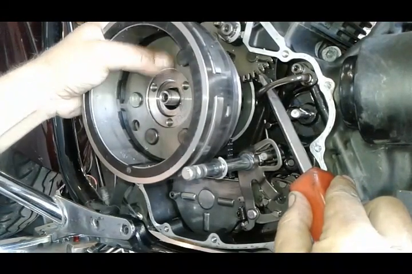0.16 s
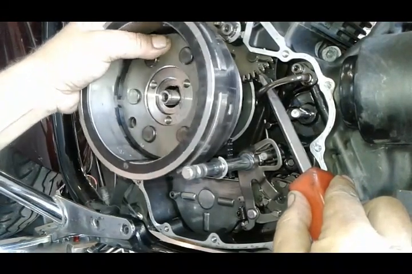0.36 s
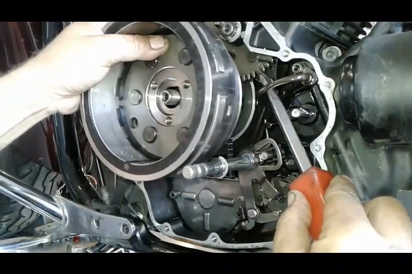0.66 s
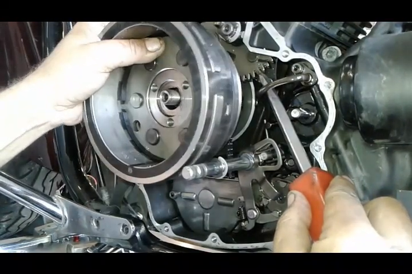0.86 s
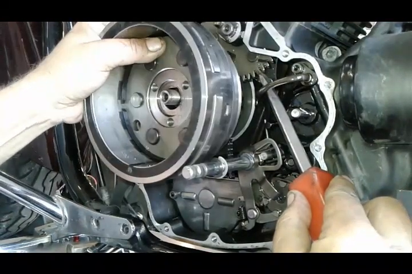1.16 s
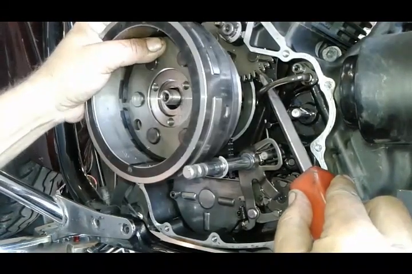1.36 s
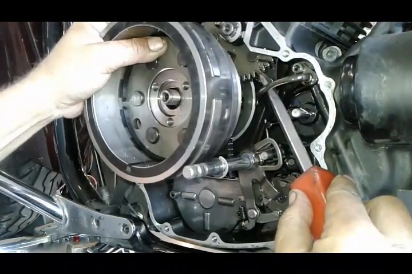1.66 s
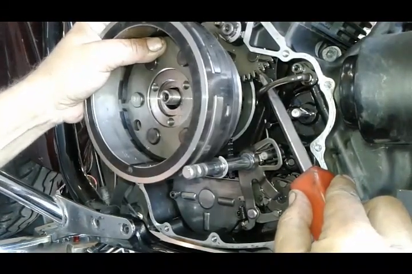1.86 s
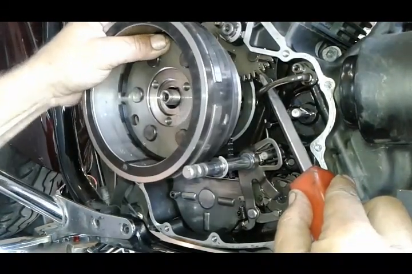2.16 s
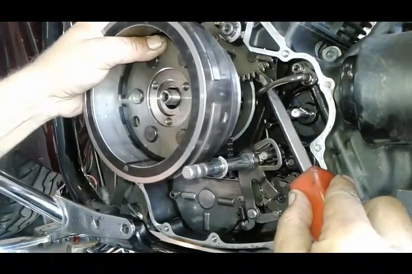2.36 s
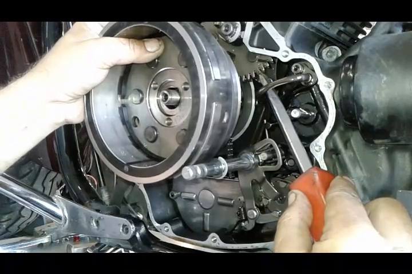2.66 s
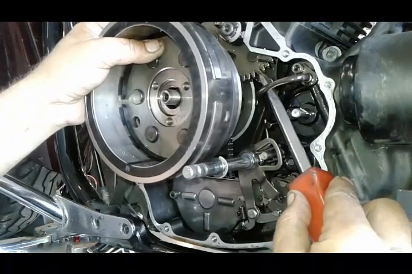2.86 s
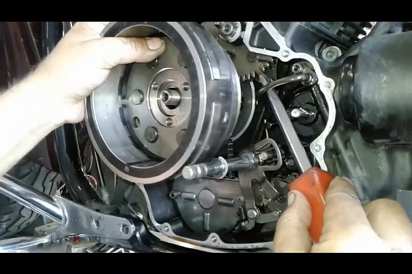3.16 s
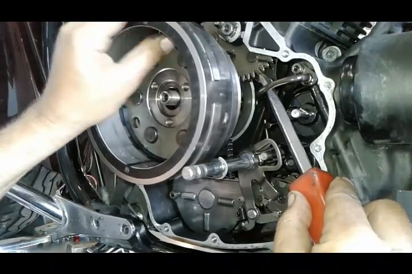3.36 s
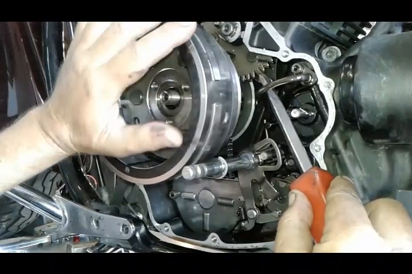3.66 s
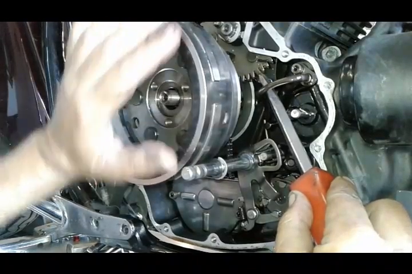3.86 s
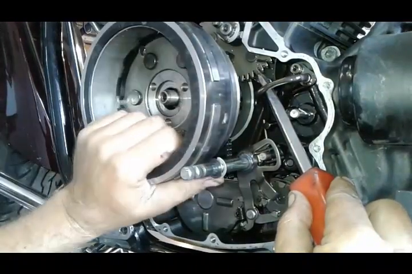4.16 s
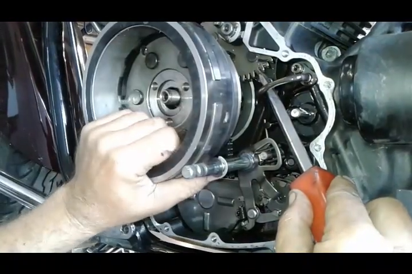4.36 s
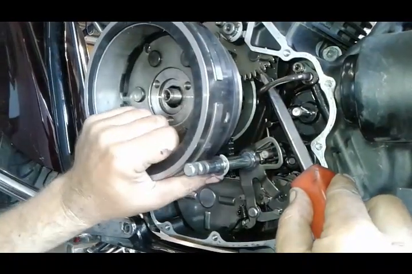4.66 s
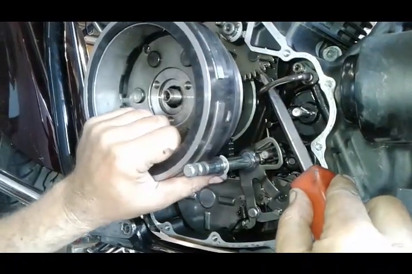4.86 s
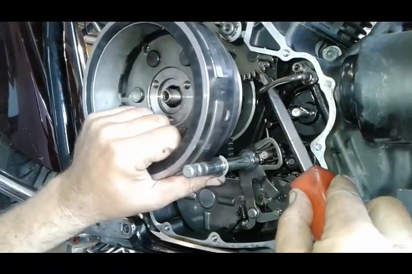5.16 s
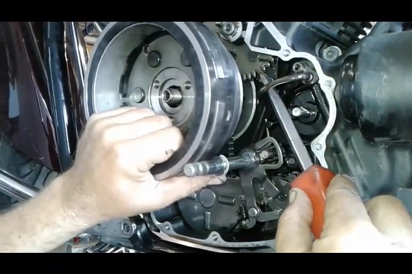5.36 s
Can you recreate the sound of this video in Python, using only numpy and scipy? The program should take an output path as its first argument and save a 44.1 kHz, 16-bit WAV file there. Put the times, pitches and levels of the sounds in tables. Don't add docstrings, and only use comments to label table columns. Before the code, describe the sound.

Close metallic clicks and soft clunks come in uneven clusters as gear teeth slip into place, over a low distant traffic drone.

```python
import sys
import numpy as np
from scipy import signal
from scipy.fft import rfft, irfft, next_fast_len
from scipy.io import wavfile
from scipy.ndimage import uniform_filter1d

SR = 44100
rng = np.random.default_rng(int(sys.argv[2]) if len(sys.argv) > 2 else 0)


def volts(x):
    e = np.asarray(x, float) / 20
    return 10 ** e


def dump(signal):
    limited = np.clip(np.atleast_2d(signal).T, -1, 1)
    pcm = np.round(limited * 32767).astype(np.int16)
    wavfile.write(sys.argv[1], SR, pcm)


N = 242991


def evened(x):
    return x / np.sqrt(np.mean(x ** 2) + 1e-20)


def read(points, hz):
    f, value = np.transpose(points)
    return np.interp(np.log(hz + 1), np.log(f + 1), value)


def add(mix, start_s, sound):
    part = mix[..., round(start_s * SR):][..., :sound.shape[-1]]
    part += sound[..., :part.shape[-1]]


def lay(events, voice, early_s=0.0):
    layer = np.zeros((2, N))
    for start_s, *settings in events:
        add(layer, start_s - early_s, voice(*settings))
    return layer


def band(x, lo_hz, hi_hz, order=4):
    return signal.sosfilt(signal.butter(order, [lo_hz, min(hi_hz, .45 * SR)], "bandpass", fs=SR, output="sos"), x)


def ring(modes, push_s):
    t = np.arange(SR // 3) / SR
    luck = rng.standard_normal((len(modes), 2, 3, 1))
    out = 0
    for (hz, db, t60), a in zip(modes, luck):
        fade = volts(db + 2 * a[:, 0] - 60 * t / t60)
        out = out + fade * np.sin(2 * np.pi * hz * (1 + 0.00055 * a[:, 1]) * t + 3 * a[:, 2])
    out *= 1 - np.exp(-(t / max(push_s, .002)) ** 2)
    return out / abs(out).max()


def rattle(fade_s, rise_s, linger_db=-60):
    t = np.arange(SR // 8) / SR
    fade = np.exp(-t / max(fade_s, .0005)) + volts(linger_db) * np.exp(-t / 0.039)
    return rng.standard_normal((2, len(t))) * (1 - np.exp(-t / rise_s)) * fade


def clatter(lo_hz, hi_hz, fade_s, rise_s, linger_db=-16):
    out = band(rattle(fade_s, rise_s, linger_db), lo_hz, hi_hz)
    return out / abs(out).max()


# (pitch_hz, likeness from -1 to 1)
BACKGROUND_LIKENESS = [(60, 1), (130, .995), (250, .93), (400, .75), (800, .1), (1350, -.35), (2400, .15),
                       (6000, -.1), (15000, .2)]


def noise(spectrum, size, patchy_db):
    frames, hz = 4 * N // size + 5, np.fft.rfftfreq(size, 1 / SR)
    a, b, c, d, patches = rng.standard_normal((frames, len(hz), 5)).T
    patches = uniform_filter1d(patches, size=10, axis=0)
    patches = evened(uniform_filter1d(patches, size=10, axis=1))
    same = np.clip(read(BACKGROUND_LIKENESS, hz), -1, 1)[:, None]
    left = a + 1j * b
    right = same * left + np.sqrt(1 - same ** 2) * (c + 1j * d)
    patches_db = patchy_db * patches / (1 + (hz[:, None] / 1500) ** 2)
    z = np.array([left, right]) * volts(read(spectrum, hz)[:, None] + patches_db)
    return evened(signal.istft(z, nperseg=size, noverlap=3 * size // 4)[1][:, :N])


# (pitch_hz, level_db per Hz)
RUMBLE_COLOUR = [(12, -66), (20, -29), (22, -28), (29, -25), (41, -9.5), (59, 5), (81, 1.5), (130, -9),
                 (170, -38), (290, -120)]
# (time_s, level_db)
RUMBLE_LEVEL = [(0, -50.5), (0.55, -46), (0.9, -43.5), (1.5, -47.5), (2.1, -47.5), (2.8, -42), (3.4, -44.5),
                (3.72, -41), (3.9, -48), (4.0, -36), (4.1, -49.5), (4.8, -47), (5.1, -48), (5.25, -48.5),
                (5.51, -48.5)]


def rumble():
    level_db = np.interp(np.arange(N) / SR, *np.transpose(RUMBLE_LEVEL))
    return volts(level_db) * noise(RUMBLE_COLOUR, size=4096, patchy_db=-0.5)


# (pitch_hz, level_db per Hz)
DRONE_COLOUR = [(90, -18.5), (125, -3.5), (165, 2.5), (210, -2.5), (270, -3.5), (340, -47)]
# (time_s, level_db)
DRONE_LEVEL = [(0, -2), (0.26, -6.5), (0.45, 1), (0.9, 4.5), (1.15, -1), (1.8, -0.5), (2.2, -1.5),
               (2.55, -4), (2.8, 1.5), (3.2, 4.5), (3.4, -1), (3.75, 4), (3.9, 0), (4.4, -3.5), (4.9, 4.5),
               (5.15, -1.5), (5.51, 2.5)]


def drone():
    pass_db = np.interp(np.arange(N) / SR, *np.transpose(DRONE_LEVEL))
    return volts(-52 + pass_db) * noise(DRONE_COLOUR, size=2048, patchy_db=3.0)


# (pitch_hz, level_db per Hz)
HISS_COLOUR = [(150, -21.5), (250, -8), (330, -12), (414, -9.5), (686, -16), (1020, -11.5), (1120, -13),
               (2570, -21.5), (3980, -29), (4820, -29), (5930, -34), (15200, -41), (16000, -37)]


def hiss():
    return volts(-57.5) * noise(HISS_COLOUR, size=1024, patchy_db=.15)


# (time_s, motor_hz, load_db)
MOTOR = [
    (0, 158.6, -4),
    (1.1, 159.4, -2),
    (1.6, 159.6, 1),
    (2.9, 160, 2),
    (3.7, 160.5, 1),
    (4.1, 160.8, -5),
    (4.4, 161.4, -2),
    (4.8, 161.7, 1),
    (5.1, 161.7, -4),
    (5.51, 161.7, -5),
]


def whine():
    resonance_hz, slow_width_hz, width_hz = 4930, 650, 210
    even_slow, even_fast = 0.06, .92
    left_lead_turns = np.array([[0.24], [0]])
    s, hz, load_db = np.transpose(MOTOR)
    even = even_slow + (even_fast - even_slow) * ((hz - hz.min()) / np.ptp(hz)) ** 1.2
    t = np.arange(N) / SR
    speed_hz, even = np.interp(t, s, hz), np.interp(t, s, even)
    turns = np.cumsum(speed_hz) / SR
    width = np.interp(speed_hz, [hz.min(), hz.min() + 1], [slow_width_hz, width_hz])
    out = np.zeros((2, N))
    for k in range(27, 36):
        waver = np.interp(t, np.arange(36) / 6, rng.standard_normal(36))
        near = np.exp(-.5 * ((k * hz.mean() - resonance_hz) / width) ** 2)
        share = 1 - even if k % 2 else even
        wave = np.cos(2 * np.pi * (k * turns + rng.random() + left_lead_turns))
        out += near * volts(3 * waver) * share * wave
    return volts(-73.5 + np.interp(t, s, load_db)) * evened(out)


# (lowest_hz, highest_hz, fade_s)
PARTS = [(600, 2140, 0.011), (1700, 3280, 0.0044), (3300, 5230, 0.0017)]
CHOKE_S = 0.0018


def click(level_db, pitch_hz, free_s, parts_db):
    blur = sum(volts(level_db + rel - 1.5) * clatter(*part, rise_s=0.0012) for rel, part in zip(parts_db, PARTS))
    t = np.arange(SR // 10) / SR
    twin_hz = pitch_hz * (1 - 0.061)
    pair = np.sin(2 * np.pi * pitch_hz * t) + 0.12 * np.sin(2 * np.pi * twin_hz * t)
    swell = 1 - np.exp(-(t / .0011) ** 2)
    choke_db = -13 * np.clip((t - free_s) / CHOKE_S + 1, 0, 1)
    return blur, volts(level_db - 1.0 - 60 * t / 0.045 + choke_db) * swell * pair


# (start_s, level_db, pitch_hz, own_clatter_db, neighbours_clatter_db)
ON_ROTOR = [(0.515, -31, 780, -2, -21), (0.619, -32, 816, -7.5, -12), (0.769, -39, 828, -11, -9),
            (1.13, -59, 630, 11, -14), (1.642, -36, 1304, 2.5, -6.5), (3.124, -44, 850, 7.5, 1),
            (4.252, -43.5, 1000, -6, -24), (4.349, -31.5, 1000, -11, -13), (4.4675, -34, 690, -12, -6),
            (4.499, -47, 910, -14, -19), (4.527, -34, 690, -13, -9), (4.591, -42, 1210, -7, -15),
            (4.607, -41, 955, -6, -5), (4.92, -24.5, 1484, 4.5, -2.5), (5.055, -38.5, 615, 0.5, -9),
            (5.279, -37, 2550, 2.5, -1), (5.379, -48, 600, -3, -18), (5.394, -71, 600, -7, -12),
            (5.471, -33, 777, -9, -4.5), (5.492, -42.5, 715, 7, 5)]
ON_GEAR = [(0.185, -45.5, 1650, 8.5, -2), (0.57, -53, 900, 9.5, -10), (0.599, -42, 1290, 2, 4),
           (1.267, -55, 1030, 10.5, 9), (1.501, -42, 2270, -4, -4.5), (1.809, -51, 690, 6, 2),
           (1.838, -43, 1510, -2, -8), (1.865, -37, 2550, 8, -3), (1.943, -50, 2640, 5, 1),
           (1.969, -21, 1517, -0.5, -7.5), (2.2304, -12.5, 2450, -7, -15), (4.627, -29.5, 1484, -12, -14)]
ON_BLADE = [
    (0.779, -41.5, 4400, -5, -19),
    (0.834, -39, 2460, 7.5, -3.5),
    (0.8565, -14, 2455, -15, -17),
    (1.289, -43.5, 4100, 9, -6),
    (1.321, -26, 1586, -5, -2),
    (1.583, -39, 1510, 2.5, -2.5),
    (3.213, -44, 1890, 4, -12),
    (4.211, -47, 1020, -8, -30),
    (4.261, -47, 930, -26, -26),
    (4.712, -17, 2410, -13, -15),
]
# (to_rotor_db, to_gear_db, to_blade_db)
PASSED_ON = [(0, -2, -3.5), (-2.5, 0, -2.5), (5.5, 9, 0)]


def clicks():
    clatters, tones = np.zeros((2, N)), np.zeros(N)
    for struck, rows in enumerate([ON_ROTOR, ON_GEAR, ON_BLADE]):
        for s, db, hz, own_db, passed_db in rows:
            parts_db = passed_db + np.array(PASSED_ON[struck], float)
            parts_db[struck] = own_db
            free_s = min(slide[0] - s if slide[0] > s + CHOKE_S else 1 for slide in SLIPS)
            blur, tone = click(db, hz, free_s, parts_db)
            add(clatters, s - .0005, blur)
            add(tones, s - .0005, tone)
    return clatters, tones


# (start_s, length_s,
# level_db, pitch_hz)
STROKES = [(0.28, 0.1, -65, 900), (0.324, 0.15, -59, 2590), (2.74, 0.18, -62, 1200),
           (2.87, 0.3, -50.5, 1370), (3.222, 0.096, -68, 2640), (3.278, 0.089, -63, 5400),
           (3.822, 0.078, -57, 1000), (3.914, 0.31, -67.5, 5200), (3.998, 0.035, -68, 4400),
           (4.081, 0.081, -57.5, 1000), (4.201, 0.066, -52.5, 1070), (4.458, 0.14, -45, 1230),
           (4.656, 0.063, -48.5, 2200)]
# (lowest_hz, highest_hz)
RUB_BANDS = [(500, 1570), (1900, 3080), (3900, 5800)]


def brush():
    rise_share, fall_share, db_per_octave = 0.07, 0.26, 23.5
    grain = volts(2.4 * np.minimum(rng.exponential(1, N // 100 + 1), 3)).repeat(100)[:N]
    rub = rng.standard_normal((2, N)) * evened(uniform_filter1d(grain, size=60))
    layers = [evened(band(rub, *edges, order=2)) for edges in RUB_BANDS]
    t, out = np.arange(N) / SR, np.zeros((2, N))
    for s, length, db, hz in STROKES:
        done = (t - s) / length
        on = np.clip(np.minimum(done / rise_share, (1 - done) / fall_share), 0, 1)
        for (lo, hi), layer in zip(RUB_BANDS, layers):
            octaves_off = abs(np.log2(hz / np.sqrt(lo * hi)))
            out += on * volts(db - db_per_octave * octaves_off) * layer
    return out


# (pitch_hz, level_db, t60_s)
BELL = [(807, 0, .17)]
# (start_s, level_db)
BELL_RINGS = [(0.3, -59), (0.513, -70), (0.861, -45), (0.965, -52), (1.307, -39.5), (1.647, -69),
              (1.971, -47), (2.264, -52), (3.13, -52), (4.733, -50), (4.924, -53), (5.47, -52)]


def bell_rings():
    return lay(BELL_RINGS, lambda db: volts(db) * ring(BELL, 0.017), early_s=.004)


# (pitch_hz, level_db, t60_s)
DRUM = [(250, -8, .14), (280, 0, .2), (315, -6, .16), (348, -3, .2), (380, -1, .24), (435, -14, .1),
        (533, -8, .11), (630, -14, .07)]
# (pitch_hz, level_db, t60_s)
SWAY = [(136, 0, .22), (195, -2, .22)]


def knock(level_db, pitch_hz, sway_db):
    push_s = 2.28 / pitch_hz
    drum = [(f, db - 17.5 * abs(np.log2(f / pitch_hz)), 0.99 * t60) for f, db, t60 in DRUM]
    hum = ring(drum, push_s) + volts(sway_db) * ring(SWAY, push_s)
    t = np.arange(hum.shape[1]) / SR
    wobble = np.interp(t / 0.0202, np.arange(40), rng.standard_normal(40))
    hum = hum * volts(7.5 * wobble * np.minimum(t / 0.11, 1))
    add(hum, 0, volts(-1.5) * clatter(213, 796, 3.55 * push_s, rise_s=0.00075))
    return volts(level_db + 1.5) * hum


# (start_s, level_db, pitch_hz,
# relative_sway_db)
KNOCKS = [(0.317, -46.5, 377, -31), (0.515, -39.5, 550, -9), (0.618, -36, 330, -2.5),
          (0.772, -41, 276, 0.5), (0.861, -37, 258, 2.5), (0.89, -34.5, 273, 6.5), (1.087, -44, 267, 2),
          (1.306, -35.5, 270, 4), (1.334, -31.5, 297, 3), (1.589, -44.5, 280, -27), (1.647, -33, 262, 1),
          (1.824, -44, 275, -3), (1.971, -41, 258, 3.5), (2.239, -43.5, 544, -26), (2.264, -40, 278, -27),
          (3.012, -54.5, 302, 0), (3.131, -38.5, 337, 3), (3.282, -58, 242, 16), (4.468, -48.5, 568, 4.5),
          (4.526, -51.5, 565, -3), (4.612, -36.5, 315, 3), (4.732, -40.5, 273, -4), (4.784, -40.5, 374, -7),
          (4.924, -30.5, 240, 3.5), (5.063, -34.5, 267, -3), (5.258, -49.5, 231, -2),
          (5.386, -39.5, 324, 1), (5.471, -44.5, 649, -6), (5.492, -31.5, 234, -5)]


def knocks():
    return lay(KNOCKS, knock, early_s=.004)


# (start_s, length_s, level_db, pitch_hz)
SQUEAK = (0.33, 0.14, -68, 1020)


def squeak(length_s, level_db, pitch_hz):
    t = np.arange(0, length_s, 1 / SR)
    drift, grip = (np.interp(t / .008, np.arange(20), row) for row in rng.standard_normal((2, 20)))
    turn = 2 * np.pi * np.cumsum(pitch_hz * (1 + .025 * drift)) / SR
    swell = np.sin(np.pi * t / length_s) ** .5
    return volts(level_db + 3 * grip) * swell * (np.sin(2 * turn) + np.sin(3 * turn))


# (pitch_hz, lead_radians)
PING_LEAD = [(400, 2.5), (1500, 1.5), (1900, 3), (2250, 3), (2430, -7), (3400, 2.5), (3780, -2), (4800, -6)]


def ping(level_db, pitch_hz, pan_db, t60_s):
    t, side = np.arange(SR // 3) / SR, np.array([[.5], [-.5]])
    turns = t * pitch_hz
    swell = 1 - np.exp(-(turns / 1.6) ** 2)
    wobble = np.interp(turns / 12, np.arange(150), rng.standard_normal(150))
    db = level_db + 3.5 * wobble * np.minimum(t / .015, 1)
    fade = volts(db + side * pan_db - 60 * t / max(t60_s, .005))
    return fade * swell * np.sin(2 * np.pi * turns + side * read(PING_LEAD, pitch_hz))


# (start_s, level_db, pitch_hz, left_right_db, t60_s)
RINGS = [(0.862, -41, 4145, 5, .1), (1.872, -40, 4300, 0, .05), (1.326, -44, 1545, 0, 0.15),
         (1.326, -45, 2606, -4, 0.11), (1.33, -40, 3600, 0, 0.076), (1.33, -49, 4915, -2, 0.14),
         (1.345, -39, 2250, 5, 0.19), (1.346, -39, 1820, -4, 0.2), (1.969, -21, 2350, -7.5, 0.024),
         (1.9815, -30.5, 3300, -3, 0.056), (1.981, -33, 1600, -6, .04), (1.985, -30.5, 2080, -1, 0.13),
         (1.976, -44, 5200, -2, 0.054), (2.243, -39, 3600, 0, 0.089), (2.25, -42, 540, 3.5, 0.41),
         (4.654, -47, 2400, -6, .15), (4.935, -54, 4600, -2, 0.085), (0.887, -24, 281.6, -3.5, 0.23),
         (1.675, -37, 280, 0, .28), (1.584, -37.5, 1200, -4, 0.04), (1.59, -48, 2089, 4, .2),
         (1.642, -45, 3000, 0, 0.028), (1.647, -41, 1500, 0, 0.11), (1.665, -37, 567, 3, 0.11),
         (1.943, -48.5, 2500, 0, 0.054), (1.961, -45, 1800, 0, .03), (3.124, -51, 3000, 0, 0.041),
         (3.213, -45, 2610, -1, 0.057), (4.919, -30, 825, 2, 0.069), (4.936, -30.5, 654, -4, 0.12),
         (2.2362, -18, 2430, 0, .025), (4.648, -40, 4300, -2, .05), (5.8, -46.5, 430, -1, 0.85),
         (0.345, -51.5, 365, 1, .5), (0.392, -50, 372, 0, .25), (4.945, -38, 530, 0, .3),
         (4.92, -33, 250, -2, 0.29)]


def rings():
    return lay(RINGS, ping, early_s=.0003)


# (start_s, level_db, pitch_hz, t60_s)
TICKS = [(0.5147, -45, 3090, 0.028), (0.5147, -42, 1700, .05), (0.599, -46, 3260, .04),
         (0.6257, -45, 4770, .03), (0.626, -43, 2490, 0.042), (0.779, -49, 3850, .04),
         (0.78, -45, 2660, .05), (0.953, -43, 2000, .03), (0.958, -48, 1500, .03),
         (0.964, -42, 3300, 0.059), (0.964, -41, 2480, 0.056), (4.228, -45, 1160, 0.056),
         (4.251, -48, 1340, .03), (4.268, -48, 910, .08), (4.3475, -32, 1315, 0.026),
         (4.358, -44.5, 1194, 0.093), (1.302, -40, 1510, 0.055), (1.311, -45, 1900, .05),
         (5.274, -42, 860, 0.036), (5.281, -43, 3840, 0.035), (5.498, -46, 1900, .06)]


def ticks():
    return lay(TICKS, lambda db, hz, t60: ping(db, hz, 0, t60), early_s=.0003)


# (pitch_hz, level_db per Hz)
SPARKLE = [(3180, -5.5), (5400, -5.5), (8320, -12.5), (10600, -21), (12700, -23), (14400, -23),
           (16000, -45)]


def slip(sparkle_db, body_db, pitch_hz, fade_s):
    drive = rattle(fade_s, rise_s=0.0014, linger_db=-18.5)
    size = drive.shape[1]
    fizz = irfft(rfft(drive) * volts(read(SPARKLE, np.fft.rfftfreq(size, 1 / SR))), size)
    body = clatter(0.51 * pitch_hz, 1.58 * pitch_hz, fade_s, rise_s=0.00045)
    body = body + 0.59 * clatter(0.85 * pitch_hz, 1.237 * pitch_hz, fade_s, rise_s=0.0011)
    return volts(sparkle_db + 7.5) * (fizz / abs(fizz).max() + volts(body_db + 1.5) * body)


# (start_s, sparkle_db, relative_body_db, body_hz)
SLIPS = [(0.608, -69, 2, 1455), (0.6263, -53.5, 9.5, 2870), (0.7842, -58, 2, 2600),
         (0.8346, -43, 2.5, 2900), (0.862, -38.5, 2, 2350), (1.327, -41.5, 13, 2350),
         (1.493, -64.5, 9.5, 2320), (1.5917, -48.5, 7.5, 2210), (1.866, -49, 4.5, 3400),
         (1.8794, -55, 12, 3480), (1.9796, -37, 2.5, 1700), (2.236, -27.5, 1.5, 2800),
         (3.2104, -50.5, 0.5, 1840), (3.219, -63, -14, 2550), (3.3, -58.5, -7, 1700),
         (3.9844, -58.5, -5, 3870), (4.355, -54, -18, 1510), (4.469, -61, -7, 1580),
         (4.531, -65, 10.5, 1530), (4.6337, -56.5, 17.5, 2320), (4.7212, -37.5, 7, 2300),
         (5.2826, -54, 4, 2630), (5.291, -64.5, 16, 2370)]
# (start_s, sparkle_db, relative_body_db, body_hz)
DRAGS = [
    (0.9607, -52, 6.5, 2880),
    (4.6424, -46, 1, 3300),
    (5.477, -58.5, 9, 1520),
]


def slips():
    quick = lay(SLIPS, lambda *row: slip(*row, fade_s=0.0073), early_s=.001)
    return quick + lay(DRAGS, lambda *row: slip(*row, fade_s=0.018), early_s=.001)


# (start_s, level_db)
HOUSING = [(0.7791, -55), (0.834, -47), (1.3214, -24), (1.6407, -42.5), (1.8093, -48.5), (3.1236, -44.5),
           (4.349, -45), (4.919, -20.5), (4.984, -53), (5.3777, -56), (5.3936, -52), (5.4936, -48)]


def housing():
    def buzz(db):
        return volts(db + 2) * clatter(4450, 5100, 0.0022, rise_s=.0005, linger_db=-55)
    return lay(HOUSING, buzz, early_s=.0005)


# (start_s, level_db, pitch_hz, left_right_db, t60_s)
PINGS = [(0.8345, -35, 3750, -1, 0.04), (0.8345, -32.5, 4200, 7, 0.04), (0.838, -36, 3880, 6, 0.04),
         (0.838, -32.5, 2520, 4, 0.057), (0.841, -42, 4120, -4, 0.04), (0.857, -26.5, 1490, -4, 0.04),
         (0.8615, -35.5, 4940, -11, 0.035), (0.8645, -28, 2490, 2, 0.027), (1.3215, -24.5, 4640, 4, 0.031),
         (1.3206, -31, 2800, 13, 0.032), (1.328, -37, 2100, -11, 0.04), (1.329, -21, 1880, 2, 0.04),
         (1.334, -28.5, 2430, -8, 0.032), (1.356, -41, 2290, 9, 0.04), (1.372, -41, 2220, -10, 0.04),
         (1.865, -41, 3820, 2, 0.047), (1.869, -35.5, 2500, -5, 0.036), (1.8775, -40, 3520, 1, 0.04),
         (1.879, -33, 3790, -4.5, 0.048), (1.888, -43, 3420, -9, 0.061), (1.973, -43, 3820, 12, 0.04),
         (2.236, -34, 3450, 3, 0.04), (2.237, -39, 4510, 6, 0.036), (2.238, -35, 4560, -3, 0.04),
         (4.6422, -33.5, 3240, 1, 0.045), (4.645, -42, 3680, -15, 0.05), (4.7205, -25, 2410, 3, 0.047),
         (4.722, -25, 1650, -5.5, 0.037), (4.9218, -29.5, 4700, 8, 0.02), (4.9205, -35, 4250, 12, 0.035),
         (4.9192, -35, 2960, 6, 0.04), (4.927, -41, 2530, 3, 0.04), (1.692, -45, 640, 0, .08),
         (4.94, -40, 758, 0, .12)]


def more_rings():
    return lay(PINGS, ping, early_s=.0003)


# (pitch_hz, level_db)
TWINS = [(349, -3.5), (381, -0.5)]


def beat(level_db, t60_s, crest_s):
    t = np.arange(SR // 3) / SR
    lead = 0.71 * np.array([[.5], [-.5]])
    twins = sum(volts(db) * np.cos(2 * np.pi * hz * (t - crest_s) + lead) for hz, db in TWINS)
    return volts(level_db - 4.5 - 60 * t / t60_s) * (1 - np.exp(-(t / 0.0027) ** 2)) * twins


# (start_s, level_db, t60_s, first_crest_s)
BEATS = [
    (0.853, -33, 0.18, .012),
    (1.301, -30, 0.27, .01),
    (1.643, -29, 0.24, .014),
    (4.919, -15, 0.25, .016),
    (5.056, -30, 0.27, 0.014),
]


def beats():
    return lay(BEATS, beat)


# (pitch_hz, likeness from 0 to 1)
NEAR_LIKENESS = [(100, 1), (200, .97), (350, .93), (800, .55), (1300, .5), (2500, .7), (4000, .5),
                 (6000, .4), (12000, .2)]
# (pitch_hz, left_right_db)
TILT = [(60, 0), (180, -2), (550, 2.5), (1650, -2.5), (4970, 1), (15000, 1)]
# (pitch_hz, lead_radians)
LEAD = [(120, 0.5), (350, 0.5), (800, -1.5), (1400, 1), (2500, 2), (4700, 1.5), (7000, 7), (12000, 4)]


def ports(x):
    size = next_fast_len(N)
    hz, (a, b) = np.fft.rfftfreq(size, 1 / SR), rfft(x, size)
    same, tilt = np.clip(read(NEAR_LIKENESS, hz), 0, 1), volts(.5 * read(TILT, hz))
    late = same * a * np.exp(-1j * read(LEAD, hz))
    right = late + np.sqrt(1 - same ** 2) * b
    return irfft([a * tilt, right / tilt], size)[:, :N]


# (pitch_hz, t60_s)
GARAGE = [(150, 0.063), (500, 0.55), (1500, 0.27), (4000, 0.2), (10000, 0.3)]


def garage(x):
    taps = np.zeros((2, SR // 2))
    at = np.arange(500, SR // 2 - 20, 20)
    at = at + rng.integers(0, 20, (2, len(at)))
    np.put_along_axis(taps, at, rng.choice([-1., 1.], at.shape), 1)
    hz, t, z = signal.stft(taps, SR, nperseg=256)
    tail = signal.istft(z * volts(-60 * t / read(GARAGE, hz)[:, None]), SR, nperseg=256)[1]
    return signal.fftconvolve(x[None], tail / np.linalg.norm(tail[0]), axes=1)[:, :N]


def scene():
    background = rumble() + drone() + hiss() + whine()
    clatters, tones = clicks()
    steel = clatters + slips() + housing()
    frame = bell_rings() + knocks()
    pings = rings() + ticks() + more_rings() + beats()
    add(pings, SQUEAK[0], squeak(*SQUEAK[1:]))
    near = ports(steel + frame) + tones * volts(np.array([[1.5], [-1.5]]))
    to_room = volts(-16.5) * pings[0] + volts(-14.0) * steel[0] + volts(-11.5) * tones + volts(-10.0) * frame[0]
    return near + pings + garage(to_room) + brush() + background


def roll_off(x):
    return signal.sosfilt(signal.butter(12, 15800, fs=SR, output="sos"), x)


def record(dry):
    edge = signal.firwin(511, 15790, window=("kaiser", 9), fs=SR)
    mix = signal.oaconvolve(dry, edge[None], "same") - .0006
    return roll_off(mix)


dry = scene()
out = record(dry)
dump(out)
```